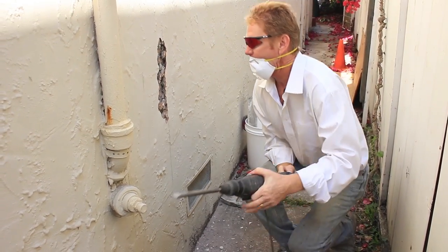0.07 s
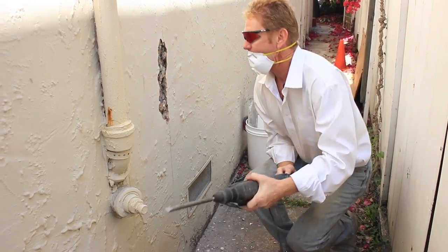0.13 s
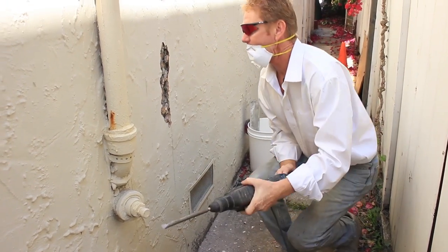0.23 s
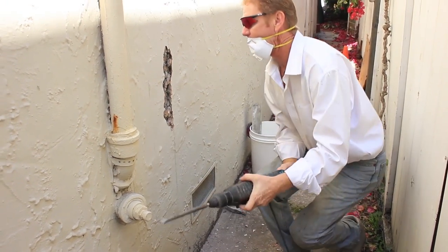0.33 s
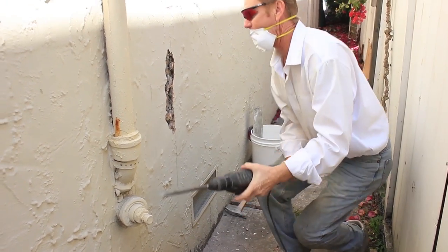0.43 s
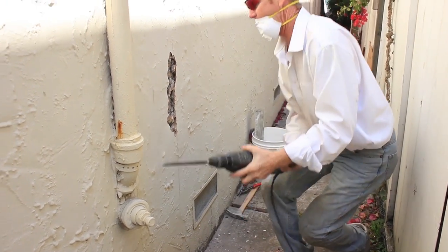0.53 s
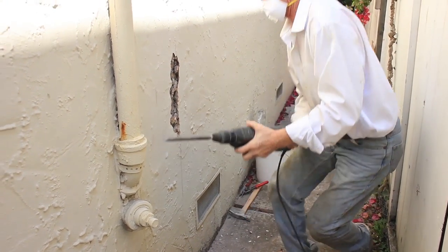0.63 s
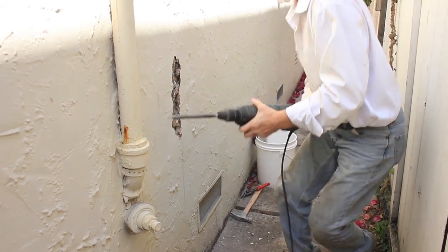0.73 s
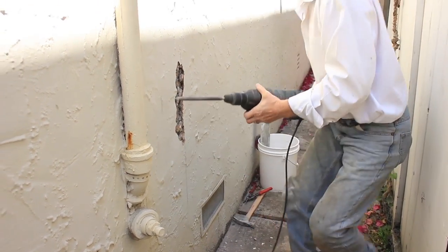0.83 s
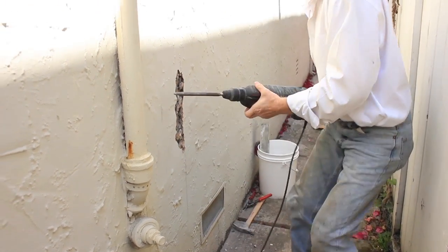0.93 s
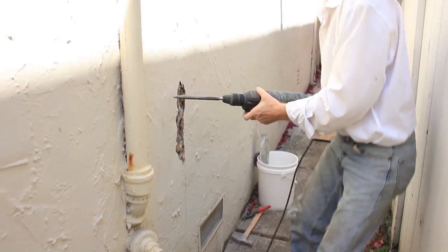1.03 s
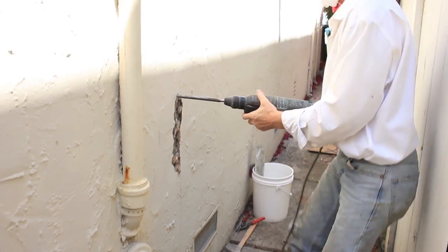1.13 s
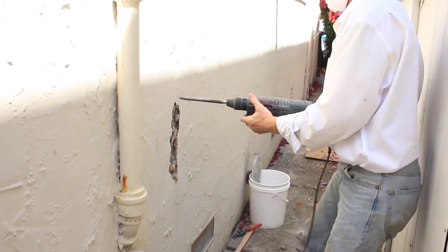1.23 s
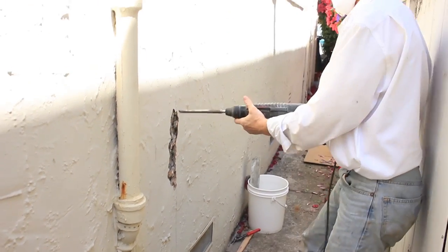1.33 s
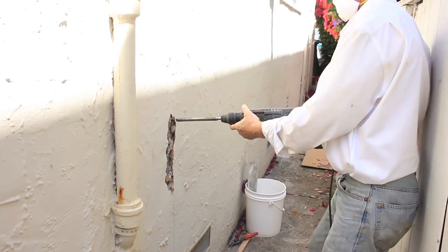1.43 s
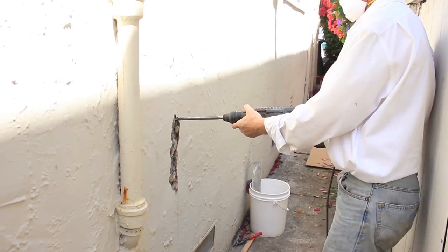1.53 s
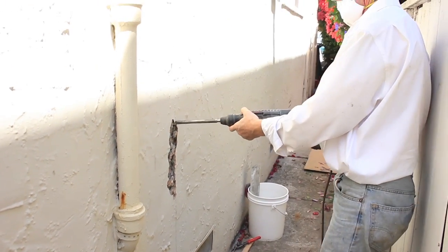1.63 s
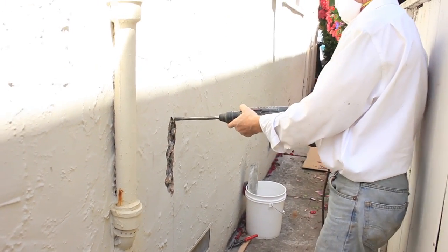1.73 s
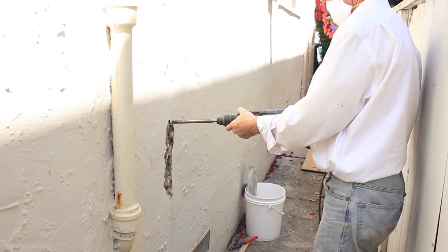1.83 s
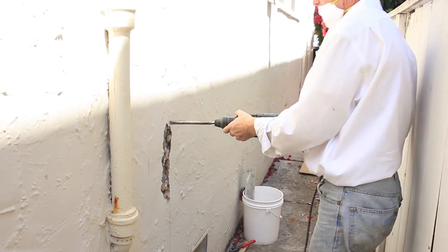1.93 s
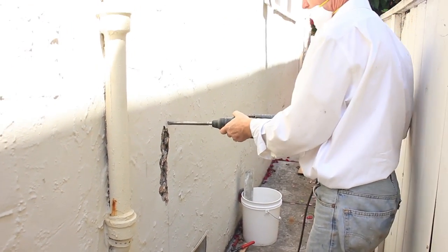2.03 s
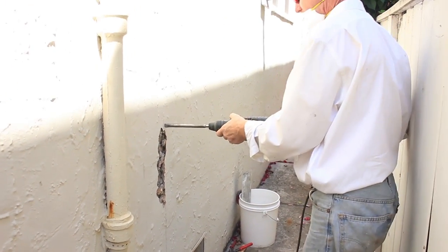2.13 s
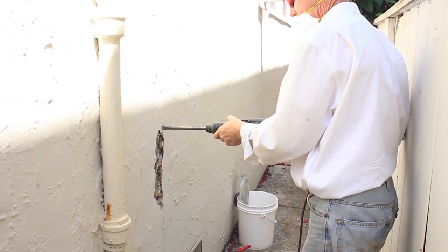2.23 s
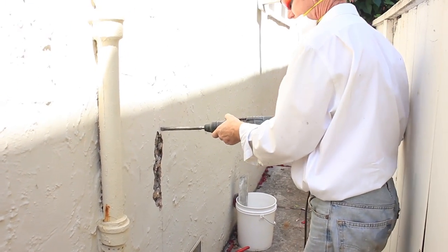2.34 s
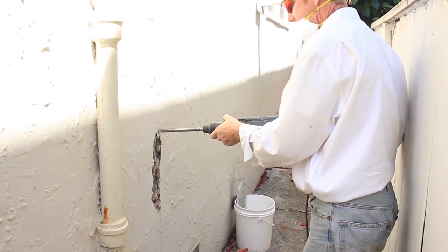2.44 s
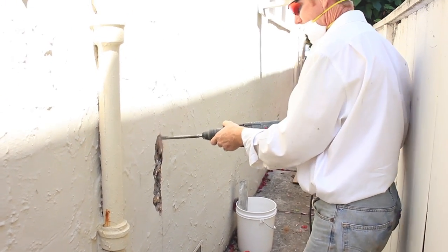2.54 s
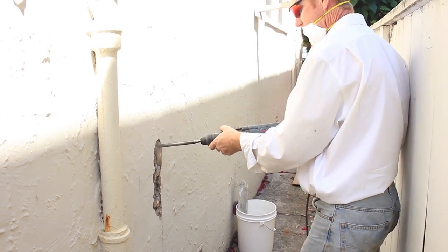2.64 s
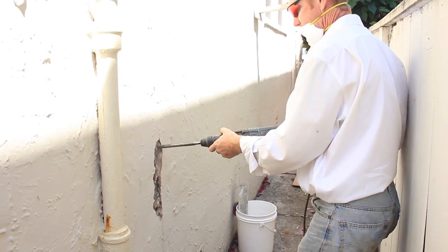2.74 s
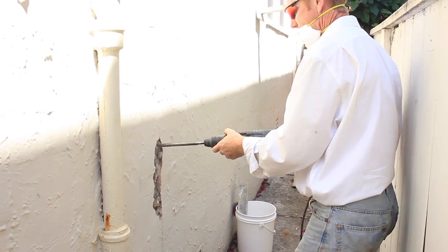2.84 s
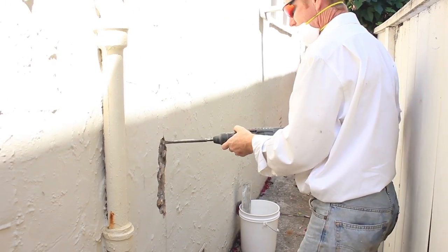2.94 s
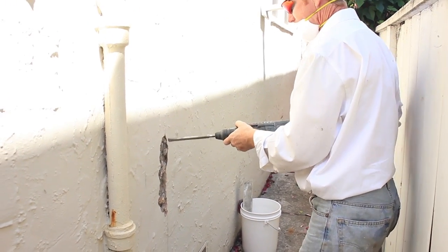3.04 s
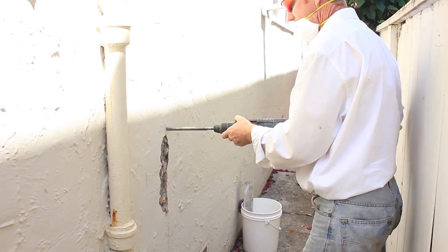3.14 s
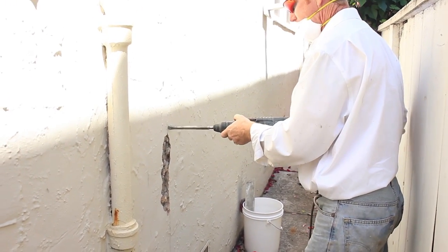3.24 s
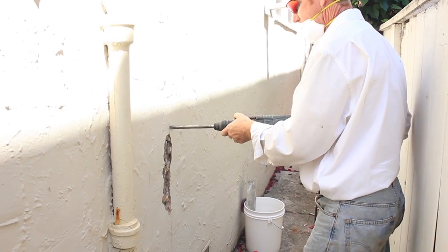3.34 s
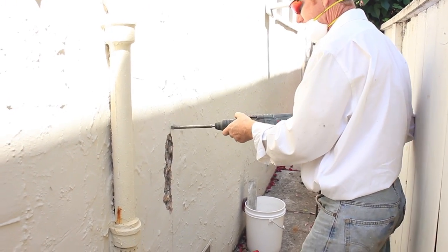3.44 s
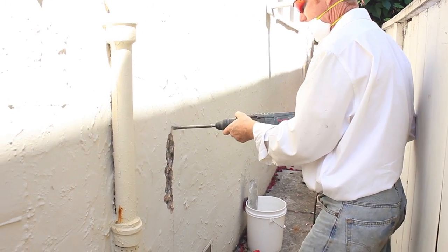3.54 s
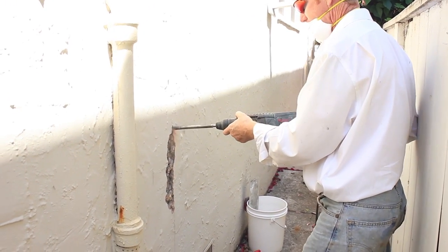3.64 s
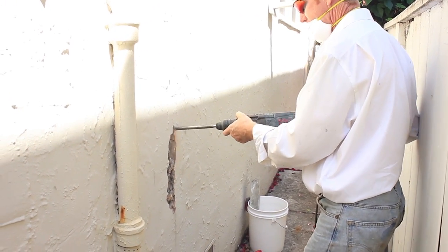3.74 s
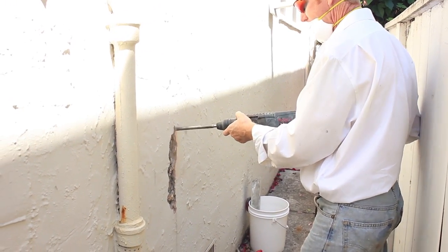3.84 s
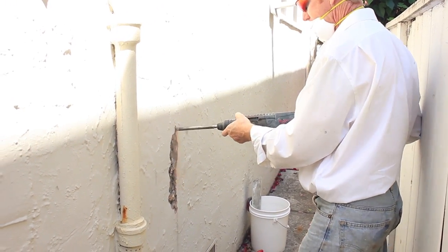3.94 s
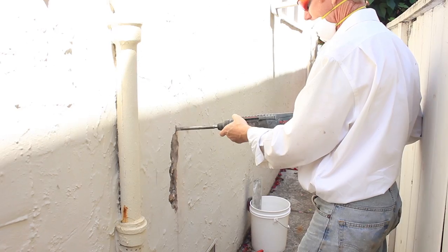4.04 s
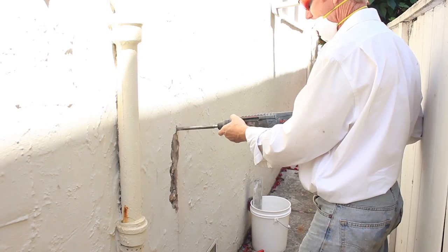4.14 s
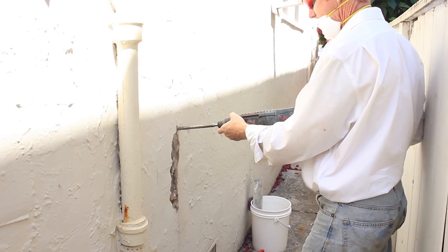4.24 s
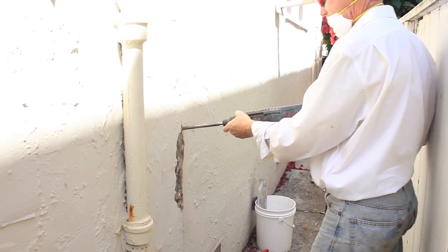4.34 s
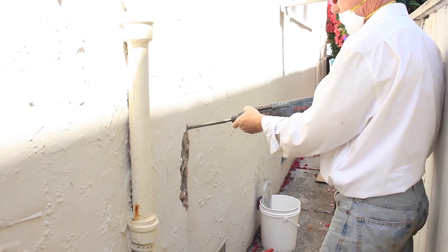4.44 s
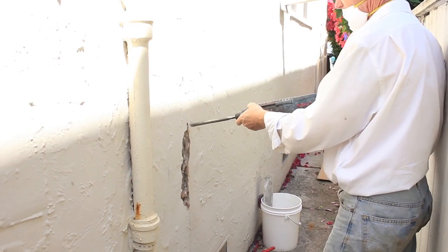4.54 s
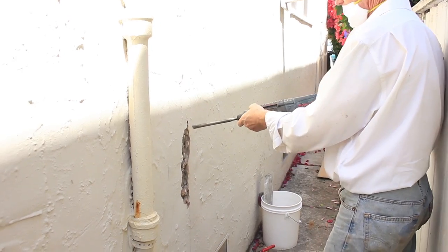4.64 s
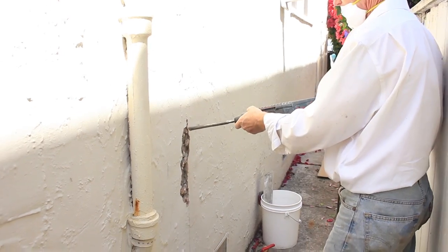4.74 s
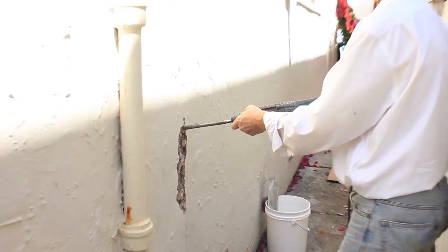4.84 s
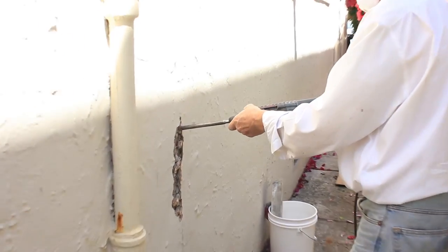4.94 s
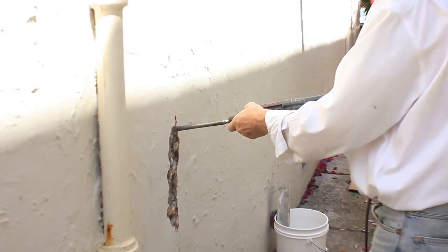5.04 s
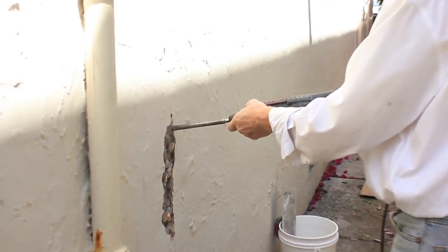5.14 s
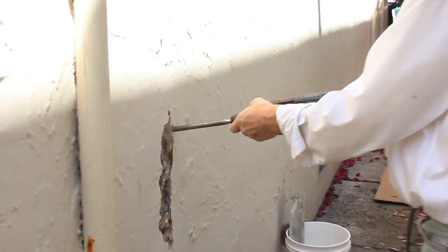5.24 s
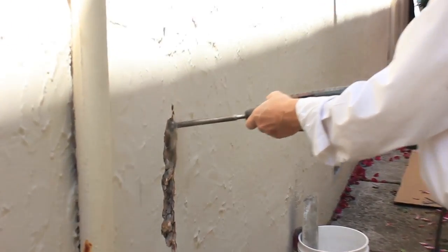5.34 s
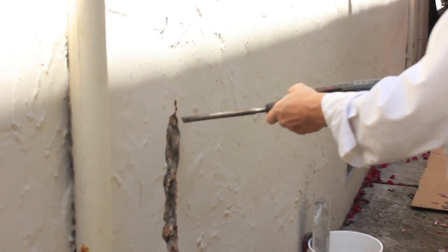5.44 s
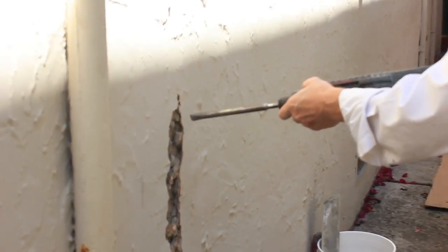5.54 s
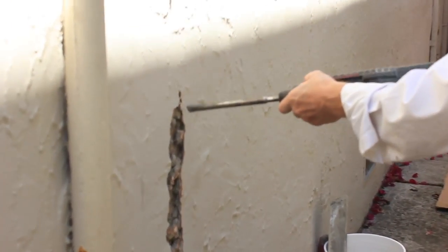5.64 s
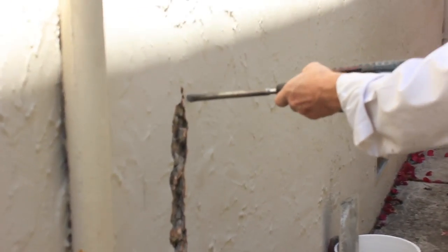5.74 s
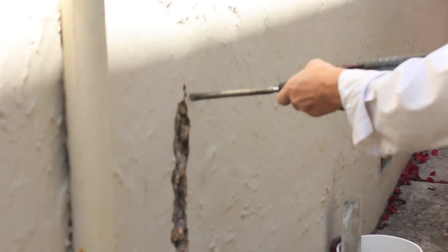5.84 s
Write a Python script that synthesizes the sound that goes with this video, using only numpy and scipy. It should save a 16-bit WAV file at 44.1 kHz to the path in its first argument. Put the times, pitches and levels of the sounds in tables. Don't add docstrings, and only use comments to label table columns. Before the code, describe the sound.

Close stereo pickup between two walls: low air noise and light clicks of a tool being handled, growing busier. A corded electric hammer suddenly spins up and pounds the wall with gritty crunching, whines higher when the chisel comes loose, drops in pitch for a heavy pressed stretch, rises again, bites briefly with metallic pings, and ends still running unloaded.

```python
import sys
import numpy as np
from scipy import signal
from scipy.fft import rfft, irfft, next_fast_len
from scipy.io import wavfile
from scipy.ndimage import uniform_filter1d

SR = 44100
rng = np.random.default_rng(int(sys.argv[2]) if len(sys.argv) > 2 else 0)


def boost(x):
    u = np.asarray(x, float) / 20
    return 10 ** u


def waveform_to_disk(signal):
    frames = np.transpose(np.atleast_2d(signal))
    scaled = np.clip(frames, -1, 1) * 32767
    samples = np.round(scaled).astype(np.int16)
    wavfile.write(sys.argv[1], SR, samples)


N = 258999
TIME = np.arange(N) / SR


def rms_one(x):
    return x / np.sqrt(np.mean(x ** 2) + 1e-20)


def db_sum(*levels_db):
    return 10 * np.log10(sum(boost(db) ** 2 for db in levels_db))


def band(x, low_hz, high_hz):
    return signal.sosfilt(signal.butter(2, [low_hz, high_hz], "band", fs=SR, output="sos"), x)


def ring(clicks, hz, t60):
    r, w = boost(-60 / (t60 * SR)), 2 * np.pi * hz / SR
    return signal.lfilter([0, np.sin(w)], [1, -2 * r * np.cos(w), r * r], clicks + 1e-18)


def fade(clicks, t60):
    return signal.lfilter([1], [1, -boost(-60 / (t60 * SR))], clicks + 1e-18)


def drift(rate_hz):
    r = np.exp(-2 * np.pi * rate_hz / SR)
    wander = signal.lfilter([1], [1, -2 * r, r * r], rng.standard_normal(N + SR))
    return rms_one(wander[SR:])


def coloured(spectrum):
    noise = rng.standard_normal((2, N))
    hz, db = np.transpose(spectrum)
    edges = np.geomspace(hz[0], hz[-1], int(2.5 * np.log2(hz[-1] / hz[0])) + 2)
    levels_db = np.interp(np.log(edges[1:] * edges[:-1]) / 2, np.log(hz), db)
    out = 0
    for k, level_db in enumerate(levels_db):
        out = out + boost(level_db) * band(noise[k % 2], edges[k], edges[k + 1])
    return rms_one(out)


def recorder_gain():
    # time in seconds, change of gain in dB.
    gain_steps = [
        (1.87, -4.5),
        (2.312, -5.5),
    ]
    return boost(sum(db * np.clip((TIME - s) / .012 + .5, 0, 1) for s, db in gain_steps))


def hiss():
    mid, side = rng.standard_normal((2, N)) * recorder_gain()
    return boost(-60.5) * mid + boost(-72) * side * [[1], [-1]]


def street():
    # frequency in Hz, level in dB per Hz.
    air = [(12, -29), (20, -19), (35, -21.5), (54, -22), (234, -33.5), (306, -32), (608, -35.5),
           (926, -35.5), (1720, -48.5), (4000, -53), (5200, -68), (8800, -120)]
    lull_db = -6 * np.exp(-((TIME - .82) / .093) ** 2)
    level_db = -51 + lull_db + .5 * drift(1.2)
    return boost(level_db) * recorder_gain() * coloured(air)


def handling():
    # start in seconds, peak in dB, thud below 500 Hz in dB, bright grit above 2 kHz in dB,
    # t60 in seconds.
    contacts = [(0.044, -62, -68, -54, 0.13), (0.067, -42, -60, -55, 0.065), (0.526, -59, -54, -59, 0.08),
                (0.818, -48, -59, -58, 0.12), (1.05, -48, -36, -64, 0.11), (1.209, -39.5, -63, -58.5, 0.13),
                (1.311, -49, -55, -49, 0.031), (1.335, -24, -68, -35.5, 0.036),
                (1.522, -30, -55, -43.5, 0.12), (1.534, -44, -36, -59, 0.16), (1.618, -47, -63, -55, 0.044),
                (1.644, -30, -53, -51, 0.083), (1.718, -39, -66, -71, 0.05), (1.753, -46, -50, -67, 0.19),
                (1.828, -51, -58, -56, 0.064), (1.853, -51, -61, -49, 0.092),
                (1.904, -39, -54, -53.5, 0.033), (2.117, -29, -39, -78, 0.078),
                (2.297, -37, -44, -55, 0.029), (2.314, -43, -72, -63, 0.14), (2.344, -52, -42, -52, 0.45)]
    # frequency in Hz, level in dB.
    hard_parts = [(1600, 11.5), (2400, 3.5), (3100, -0.5), (3900, -3.5), (5200, -42), (7100, -15)]
    out, noise = np.zeros(N), rng.standard_normal(N)
    thud = rms_one(band(noise, 70, 400))
    clicking = sum(boost(db) * rms_one(ring(noise, hz, .0063)) for hz, db in hard_parts)
    grit = rms_one(clicking + rms_one(band(noise, 1400, 4400)))
    t = np.arange(SR // 4) / SR
    for s, body_db, thud_db, grit_db, t60 in contacts:
        ring_hz = 702 + 34.5 * max(grit_db + 49.5, 0)
        start = round(s * SR)
        part = slice(start, start + len(t))
        body = rms_one(ring(noise[part], ring_hz, .024) + ring(noise[part], 1.37 * ring_hz, .011))
        rise_s = .0004 if body_db > -30 else .002
        decay = boost(-60 * t / t60) + boost(-22 - 60 * t / .3)
        mixed = boost(body_db - 5) * body + boost(thud_db + 1) * thud[part] + boost(grit_db + 5) * grit[part]
        out[part] += np.minimum(t / rise_s, 1) * decay * mixed
    return out


def blow_rate():
    # time in seconds, speed it settles at in blows per second, lag in seconds.
    loads = [
        (2.361, 68, .063),
        (2.675, 84.4, .18),
        (3.528, 70.3, .118),
        (4.478, 84.6, .143),
        (5.175, 73, .103),
        (5.32, 84.6, .17),
        (5.37, 76.5, .1),
        (5.45, 84.7, .15),
    ]
    speed, start = np.zeros(N), 14
    for s, goal, lag_s in loads:
        after = TIME >= s
        start = speed[after][0] or start
        speed[after] = goal + (start - goal) * np.exp((s - TIME[after]) / lag_s)
    return speed


def piston(speed):
    turns = np.cumsum(speed) / SR
    at = np.interp(np.arange(int(turns[-1])) + 1e-6, turns, np.arange(N))
    blows = np.zeros(N + 1)
    blows[at.astype(int)] = 1 - at % 1
    blows[at.astype(int) + 1] = at % 1
    return turns, blows[:N], np.floor(turns).astype(int)


def effort(speed):
    # time in seconds, lean in dB, crumbling in dB.
    contact = [(2.36, -32.5, -34.5), (2.41, -27, -24), (2.47, -22.5, -15), (2.56, -20, -16.5),
               (2.62, -19, -23.5), (2.66, -43, -22), (2.74, -30, -34.5), (3.4, -37, -30),
               (3.545, -17.5, -13.5), (3.73, -16, -11.5), (3.82, -16, -18.5), (4.4, -16, -18.5),
               (4.47, -30, -32.5), (5.06, -37.5, -35.5), (5.15, -18.5, -30), (5.28, -19.5, -27),
               (5.36, -42, -52), (5.87, -64, -30.5)]
    # time in seconds, level in dB, fall each side in dB per second.
    grazes = [
        (3.16, -42, 200),
        (3.28, -39.5, 98),
        (3.37, -30, 197),
        (3.46, -31.5, 150),
        (5.04, -36, 88),
        (5.22, -21.5, 121),
        (5.37, -25.5, 597),
        (5.86, -30, 161),
    ]
    at_s, leans_db, crumbles_db = np.transpose(contact)
    lean_db, crumble_db = np.interp(TIME, at_s, leans_db), np.interp(TIME, at_s, crumbles_db)
    graze_db = db_sum(*[db - fall * abs(TIME - s) for s, db, fall in grazes])
    speed_db = 20 * np.log10(np.maximum(speed, 1) / 84.5)
    drum_db = db_sum(lean_db, graze_db + .5)
    crush_db = db_sum(crumble_db, graze_db + 3)
    boom_db = db_sum(-25.5 + 1.9 * (crumble_db + 16.5), -30 + 1.8 * (lean_db + 16.5), graze_db)
    slack_db = -5 * np.exp(-((TIME - 6.1) / .058) ** 2)
    rattle_db = db_sum(-27, crumble_db - 10.5, lean_db - 15.5) + 2.3 * speed_db + slack_db
    tick_db = db_sum(-42.5, crumble_db - 20, lean_db - 27.5, graze_db - 25.5) + .94 * speed_db
    return drum_db, crush_db, boom_db, rattle_db, tick_db


def chisel(blows, tick_db):
    # frequency in Hz, level in dB per Hz.
    tick = [(3240, -20), (5400, -5), (5750, 0), (7880, -2.5), (11500, -5.5), (13100, -15.5), (15500, -32)]
    # time in seconds, peak in dB.
    loose = [
        (2.5546, -35),
        (2.6908, -39),
        (4.4333, -30),
        (4.4485, -34),
        (5.302, -26),
        (5.316, -28),
        (5.3293, -26),
        (5.3554, -26),
        (5.3692, -27),
    ]
    # frequency in Hz, level in dB, t60 in seconds.
    bar = [(12900, -21, 0.086), (13030, 4, 0.069), (9700, -15, 0.05), (8450, -12, .03)]
    ticks = fade(blows * boost(1.8 * rng.standard_normal(N)), t60=.012) + .34
    bright = boost(tick_db + 1) * rms_one(ticks * band(coloured(tick), 4000, 14500))
    struck = np.zeros(N)
    for s, db in loose:
        struck[round(s * SR)] = boost(db - 6)
    return bright * (np.cumsum(blows) > 0) + sum(boost(db) * ring(struck, hz, t60) for hz, db, t60 in bar)


def housing(turns, blows, stroke, rattle_db, drum_db):
    # frequency in Hz, width in Hz, knock in dB, rattle in dB, change once turned in dB.
    resonances = [(323, 49, -11, -38, 2), (394.5, 46, -1.5, 2, 0), (630, 35, -7, -2.5, -6),
                  (713, 120, 5.5, -1.5, 0.5), (1007, 290, 7, 1.5, 0.5), (1237, 137, 10, 5.5, -1),
                  (1540, 150, -3, -3, 1.5), (1930, 130, -29.5, -3.5, 2), (2290, 210, 6, 0, -2),
                  (2500, 300, -32.5, 1, 0), (3120, 350, -2, -9.5, 2.5), (3700, 157, -8, -9.5, 12),
                  (4300, 210, -14, -12, 3), (5200, 300, -20, -11, 1)]
    # multiple of the blow rate, early level in dB, late level in dB.
    gears = [(0.99, -51, -46), (9.42, -38, -33.5), (18.76, -33, -35), (94.5, -61, -59)]
    # multiple of the blow rate, early level in dB, late in dB.
    teeth = [(27, -52, -50), (29.95, -46, -46), (37, -47, -37), (45.6, -60, -33), (48, -32, -33.5),
             (53.5, -36, -44), (58.1, -35, -50), (62.5, -50, -36), (65.5, -34, -44)]
    angle = 2 * np.pi * turns
    beat = np.exp(.45 * np.cos(angle - 2.9) + .2 * np.cos(2 * angle - 1.0))
    contacts = rng.standard_normal((3, 400)) * rng.exponential(1, (3, 400)) ** .5
    orders = rfft(contacts)
    contacts = rms_one(irfft(orders / uniform_filter1d(abs(orders), size=5), 400))
    play = .0045 * drift(45)
    at = ((turns + play) % 1 * 399).astype(int)
    late = np.clip((TIME - 3.9) / .6 + .5, 0, 1)
    run = (1 - late) * contacts[0, at] + late * contacts[1, at] + .6 * drift(6) * contacts[2, at]
    knock = np.roll(blows, round(.005 * SR)) * boost(1.2 * rng.standard_normal(N)[stroke])
    pressed_db = np.clip((drum_db + 24) * .7, 0, 6)
    out, noise = 0, rng.standard_normal((2, N))
    for k, (hz, width_hz, knock_db, noise_db, turned_db) in enumerate(resonances):
        r = np.exp(-np.pi * max(width_hz, hz / 10) / SR)
        loose_rattle = run + .85 * noise[k % 2]
        drive = (-1) ** k * boost(knock_db + 28 - hz / 500) * knock + boost(noise_db) * beat * loose_rattle
        damping_db = 0 if 2000 < hz < 3500 else pressed_db
        drive = drive * boost(turned_db * late - damping_db)
        poles = [1, -2 * r * np.cos(2 * np.pi * hz / SR), r * r]
        out = out + signal.lfilter([(1 - r * r) / 2, 0, (r * r - 1) / 2], poles, drive)
    shell_cut = signal.ellip(3, .5, 8, 5480, fs=SR, output="sos")
    shell = signal.sosfilt(shell_cut, band(rms_one(out), 290, 12000))
    whine_wobble, mesh_wobble = .35 * drift(30), .9 * drift(60)
    whine, mesh = 0, 0
    for k, early_db, late_db in gears:
        whine = whine + boost(early_db + (late_db - early_db) * late + 29.5) * np.sin(k * angle + whine_wobble)
    for j, (k, early_db, late_db) in enumerate(teeth):
        wobble = np.roll(mesh_wobble, 999 * j)
        mesh = mesh + boost(early_db + (late_db - early_db) * late + 16) * np.sin(k * angle + wobble)
    return boost(rattle_db) * (boost(4.5) * shell + whine + rms_one(beat ** 2) * mesh) * (turns > 0)


def wall(blows, stroke, drum_db, crush_db, boom_db):
    # frequency in Hz, drumming in dB, crumbling in dB, t60 in seconds.
    wall_modes = [(287.1, -6.5, -16, 0.12), (345.44, 1.5, -13, 0.29), (412.7, -9, -9, 0.066),
                  (540, -11, -6.5, 0.073), (564.6, 3, -2, 0.068), (650.5, -8, -36, 0.29),
                  (724, 2.5, 1, 0.019), (783.3, 10, 0, 0.051), (866.6, 10.5, 4, 0.037),
                  (956.7, 0.5, -7, 0.092), (1111, -5.5, -1, 0.03), (1183, -22, -9, 0.24),
                  (1284.3, 5, 0.5, 0.053), (1398, -10.5, -12, 0.14), (1632, -47, 1, 0.02),
                  (1770, -19.5, -11.5, 0.11), (1850, -11.5, -10.5, 0.0067), (2052, -73, -11, 0.053),
                  (2235, -20, -12, 0.081), (2393, -77, -14, 0.042)]
    # frequency in Hz, level in dB, t60 in seconds.
    panel = [(77.6, -11, 0.081), (118.7, 5, 0.15), (132.8, 2, 0.13), (195, 6.5, 0.091), (266, -19.5, 0.3)]
    scatter = rng.standard_normal((3, N))[:, stroke]
    even = blows * boost(np.where(drum_db > -26, drum_db, 2 * drum_db + 26) + .45 * scatter[0])
    brittle = boost(np.clip(crush_db - drum_db - 4, -9, 0))
    grit = rng.standard_normal(N) * (fade(blows, t60=.02) + .16) * boost(-23) * brittle
    sharp = (blows * boost(1.2 * brittle * scatter[1]) + grit) * boost(crush_db)
    out = 0
    for k, (hz, even_db, sharp_db, t60) in enumerate(wall_modes):
        drumming = (-1) ** (k + 1) * boost(even_db + 3) * even
        crumbling = (-1) ** (k // 2) * boost(sharp_db + 4.5) * sharp
        out = out + ring(drumming + crumbling, hz, t60)
    out = out + boost(29) * band(sharp + boost(-30) * even, 2920, 3130)
    slipping = np.clip((-16 - drum_db) / 10, .1, 1)
    push = (blows * boost(.8 * scatter[2]) + .03 * slipping * rng.standard_normal(N)) * boost(boom_db - 2)
    boom = sum((-1) ** k * boost(db) * ring(push, hz, t60) for k, (hz, db, t60) in enumerate(panel))
    return (band(out, 294, 7900) + band(band(boom, 84, 730), 62, 800)) * (np.cumsum(blows) > 0)


def passage(x, t60=.2):
    size = next_fast_len(N + SR // 2)
    w = 2 * np.pi * np.arange(size // 2 + 1) / size
    spectrum, out = rfft(x, size), np.zeros((2, N))
    for side, lags_s in enumerate([(.0061, .0097, .0143, .0211), (.0067, .0089, .0151, .0197)]):
        response = 0
        for lag in lags_s:
            one_round = boost(-60 * lag / t60) / (1 + w * 4.6) * np.exp(-1j * w * lag * SR)
            response = response + one_round / (1 - one_round)
        out[side] = irfft(spectrum * response, size)[:N]
    return out


def scene():
    speed = blow_rate()
    drum_db, crush_db, boom_db, rattle_db, tick_db = effort(speed)
    turns, blows, stroke = piston(speed)
    tool = housing(turns, blows, stroke, rattle_db, drum_db) + chisel(blows, tick_db)
    near = wall(blows, stroke, drum_db, crush_db, boom_db) + tool + handling()
    echoes = passage(near)
    shared = echoes.mean(axis=0)
    return near + street() + boost(-20.5) * shared + boost(-61) * (echoes - shared) + hiss()


def band_limit(x):
    return signal.sosfilt(signal.butter(12, 15870, fs=SR, output="sos"), x)


def record(dry):
    offset = [
        [.008],
        [.0273],
    ]
    lows = signal.lfilter(*signal.butter(1, 5000, fs=SR), dry)
    x = dry + lows * [[-.1], [.1]]
    x = 1.17 * np.tanh(x / 1.17) + np.array(offset) * recorder_gain()
    return band_limit(np.clip(x, -1, 1))


dry = scene()
out = record(dry)
waveform_to_disk(out)
```